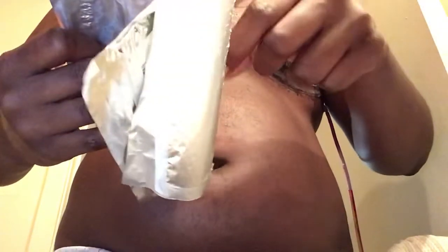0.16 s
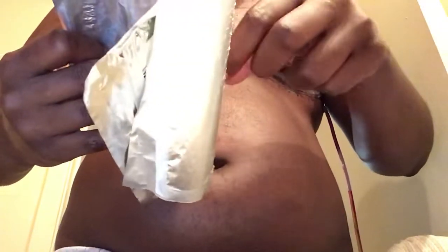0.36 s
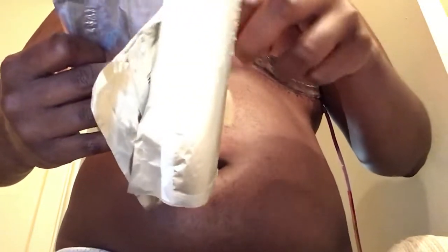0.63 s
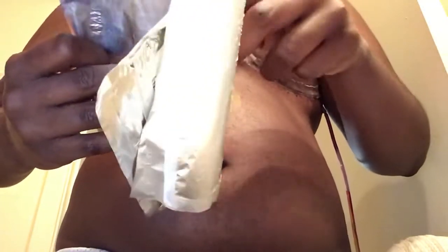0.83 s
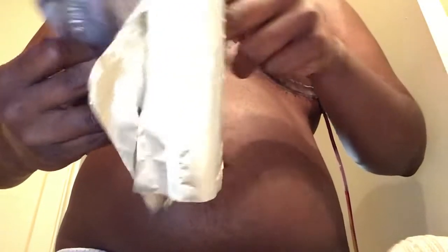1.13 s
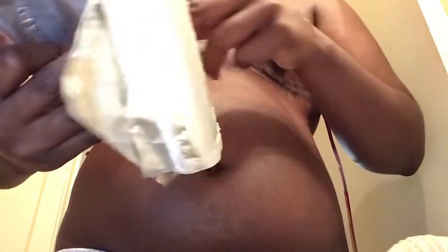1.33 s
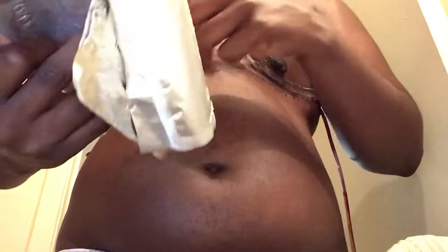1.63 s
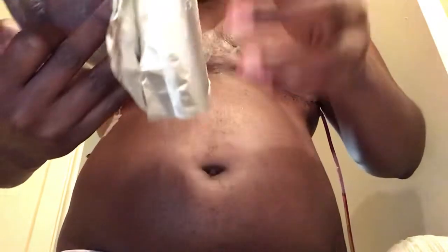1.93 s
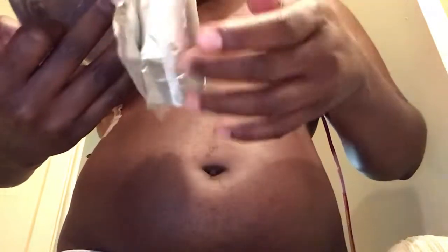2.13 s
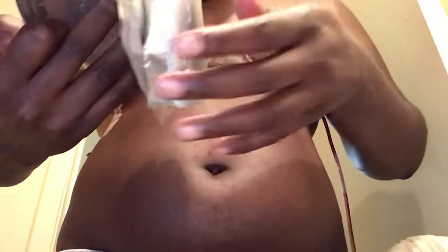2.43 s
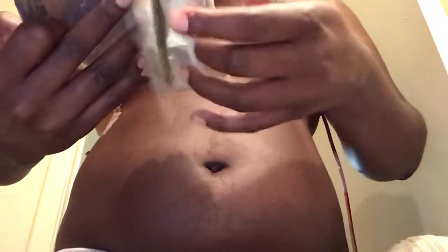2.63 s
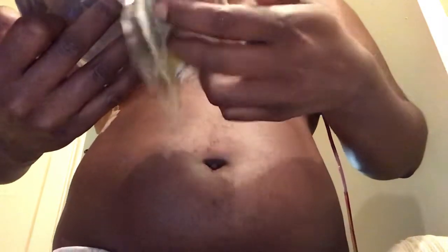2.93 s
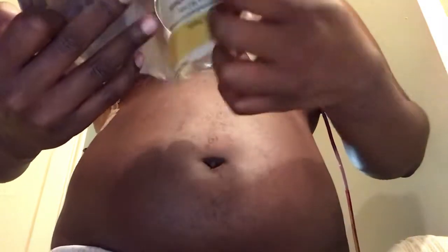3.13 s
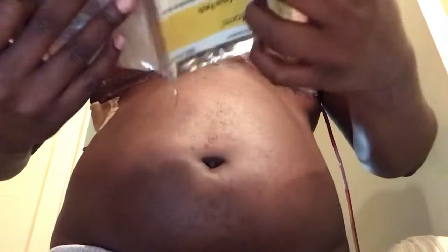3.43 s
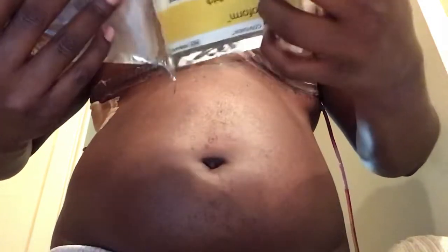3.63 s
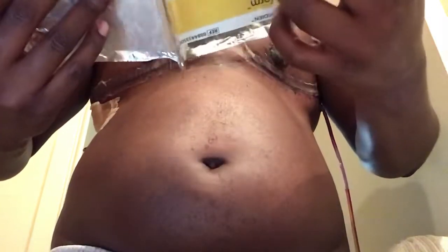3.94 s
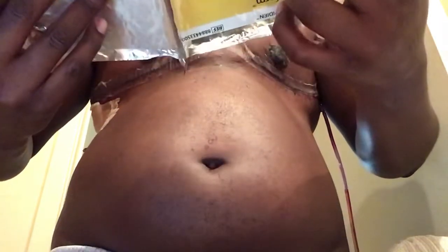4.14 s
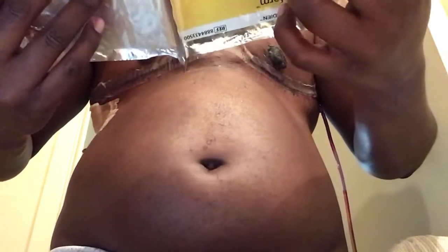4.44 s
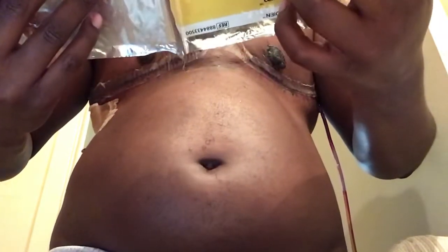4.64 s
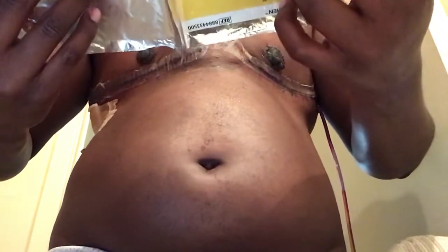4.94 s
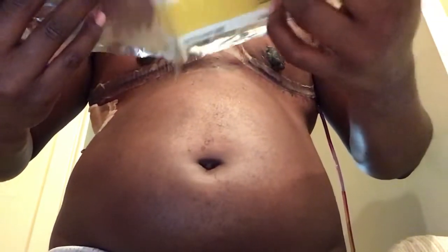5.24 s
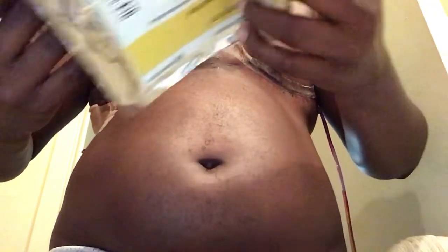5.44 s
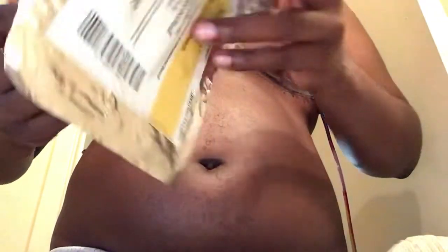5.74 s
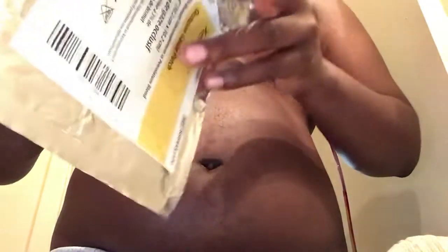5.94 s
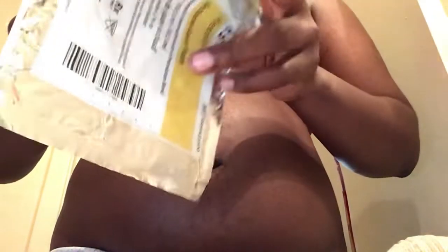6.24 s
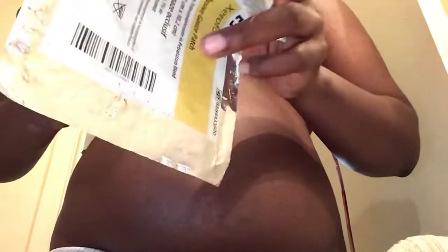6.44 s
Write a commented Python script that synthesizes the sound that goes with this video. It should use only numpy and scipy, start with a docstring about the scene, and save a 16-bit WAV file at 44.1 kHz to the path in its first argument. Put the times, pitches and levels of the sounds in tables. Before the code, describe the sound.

A steady low electric motor hum with a slow throb and a soft rush of air fills a small room throughout. For about two and a half seconds nothing else stands out. Then a stiff foil and paper pouch is turned in the hands: a tight cluster of bright snaps, sparser small clicks, a near pause, then another crisp flurry near the end. Close microphone, short room reflections.

```python
"""An electric motor hums and throbs behind a steady rush of air in a small room: sines over shaped noise.
In front of them a stiff pouch of foil and paper is turned over in two hands and pulled at.
Its facets buckle in sharp snaps: bursts of jolts and noise, shaped by rings and filters.
A faint crackle of random ticks runs between the snaps, and sliding foil fizzes briefly as grainy noise."""
import sys
import numpy as np
from scipy import signal
from scipy.fft import rfft, irfft
from scipy.io import wavfile

SR = 44100
rng = np.random.default_rng(int(sys.argv[2]) if len(sys.argv) > 2 else 0)


def dump(signal):
    """Clip the signal to [-1, 1] and save it as 16-bit WAV at the path in sys.argv[1]."""
    limited = np.clip(np.atleast_2d(signal).T, -1, 1)
    pcm = np.round(limited * 32767).astype(np.int16)
    wavfile.write(sys.argv[1], SR, pcm)


N = 290178

# Tone colour of cracking foil. Each row: frequency in Hz, relative level in dB.
CRACK_COLOUR = [(1800, -34), (3000, -0.5), (5000, 2), (8600, 1.5), (10000, -7), (12000, -7)]
# Tone colour of the foil's finest creases. Each row: frequency in Hz, relative level in dB.
SIZZLE_COLOUR = [(7000, -18), (10000, -4.5), (12000, -0.5), (14000, -7), (15800, -14)]
# The fingers tighten on the pouch, hold and let go.
# Each row: start of the hold in seconds, length of the hold in seconds, crackle level in dB.
FINGER_GRIPS = [(2.779, .24, -63.5), (3.111, 0.34, -57), (3.799, 0.31, -67), (5.417, 0.068, -63.5),
                (5.76, .22, -62.5), (6.162, 0.094, -63.5)]


def amp(db):
    """Turns decibels into a gain."""
    return 10 ** (np.asarray(db) / 20)


def evened(x):
    """Scales a sound to an rms (average strength) of one."""
    return x / np.sqrt(np.mean(x ** 2) + 1e-30)


def read(points, hz):
    """Reads a table between its rows, along a log-frequency axis."""
    f, value = np.transpose(points)
    return np.interp(np.log(hz + 1), np.log(f + 1), value)


def add(mix, s, sound):
    """Mixes a sound in at s seconds."""
    part = mix[round(s * SR):][:len(sound)]
    part += sound[:len(part)]


def drift(hz):
    """Makes a random wander of rms one, with little movement faster than hz."""
    f = np.fft.rfftfreq(N, 1 / SR)
    keep_slow = (f > 0) * np.exp(-(f / hz) ** 2)
    return evened(irfft(rfft(rng.standard_normal(N)) * keep_slow, N))


def colour(x, points, size=2048):
    """Filters to the given spectrum without sounding ahead, so that clicks keep their sharp front."""
    log_gain = np.log(amp(read(points, abs(np.fft.fftfreq(size, 1 / SR)))))
    # the Hilbert transform gives the phase that puts the energy as early as possible
    response = np.fft.ifft(np.exp(np.conj(signal.hilbert(log_gain)))).real
    return signal.fftconvolve(x, response[:size // 2])[:len(x)]


def air(level_db=-44.0, swell_db=0.48, ripple_db=2.5, ripple_hz=23.82):
    """Steady rush of moving air, lifted at its resonances and finely rippled by the room's standing waves."""
    # Colour of the air noise. Each row: frequency in Hz, relative level in dB per Hz.
    air_colour = [(28, -23), (55, -10), (85, -7), (125, -1.5), (175, -7), (225, -8.5), (420, -10.5),
                  (700, -13.5), (1400, -19), (2000, -23), (3500, -30), (5500, -36.5), (13600, -39),
                  (15800, -48)]
    # Resonances that the air stirs. Each row: frequency in Hz, width in Hz, lift in dB.
    resonances = [(171, 15, 10), (212.2, 10.3, 14), (249.5, 26.6, 10), (268.5, 16.7, 8.5), (311.6, 15, 5.5),
                  (349, 8, 8.5), (563, 19, 5.5), (587.5, 18, 13.5), (616.5, 6, 8.5), (644, 27, 4.5),
                  (695, 39, 6), (1020, 53, 3), (1054, 25, 8), (1295, 44, 6), (1490, 116, 3.5),
                  (3920, 230, 3), (5000, 460, 2)]
    hz = np.fft.rfftfreq(N, 1 / SR)
    lift_db = sum(db / (1 + (2 * (hz - f) / width) ** 2) for f, width, db in resonances)
    ripple = np.interp(hz / ripple_hz, np.arange(N), rng.standard_normal(N))
    shape_db = read(air_colour, hz) + lift_db + ripple_db * ripple * (hz > 700)
    level = amp(level_db + swell_db * drift(10.4))
    rush = irfft(rfft(rng.standard_normal(N)) * amp(shape_db), N)
    return level * evened(rush)


def motor(magnet_db=-42.0, sideband_db=-52.5, waver=0.00045, flutter_db=0.92,
          low_swell_s=0.34, magnet_swell_s=0.11):
    """Shaft tones and magnetic hum; the shaft is out of step with the mains, so neighbouring tones throb."""
    # Tones of the turning shaft. Each row: multiple of the shaft's speed, level in dB.
    shaft_tones = [(1, -69.5), (2, -48), (3, -49.5), (4, -33.5), (8, -65.5), (12, -57.5), (16, -57.5),
                   (20, -77), (23, -67.5), (24, -66), (25, -84), (28, -92)]
    shaft_hz, mains_hz = 40.47, 59.975
    t = np.arange(N) / SR
    turns = np.cumsum(shaft_hz * (1 + waver * drift(2.6))) / SR
    starts = rng.random(len(shaft_tones))
    cycles = {round(k): round(k) * turns + start for (k, db), start in zip(shaft_tones, starts)}
    hum = sum(amp(db) * np.sin(2 * np.pi * cycles[round(k)]) for k, db in shaft_tones)
    beat_hz = 3 * shaft_hz - 2 * mains_hz
    # the magnetic pull at twice the mains lies one beat under the third shaft tone
    magnet_cycles = cycles[3] - beat_hz * (t - magnet_swell_s)
    hum += amp(magnet_db) * np.sin(2 * np.pi * magnet_cycles)
    # the off-centre rotor adds a sideband to it, one beat under the second shaft tone
    sideband_cycles = cycles[2] - beat_hz * (t - low_swell_s)
    hum += amp(sideband_db) * np.sin(2 * np.pi * sideband_cycles)
    # the square root of two makes the tone levels rms levels
    return np.sqrt(2) * hum * amp(flutter_db * drift(6.8))


def room(x, early_db=-17.5, tail_db=-8.0, build_s=0.0045, count=16):
    """Near reflections from the body and walls, then a short tail that dies at its own pace in each band."""
    # How long the tail rings. Each row: frequency in Hz, time to fall by 60 dB in seconds.
    decay_times = [(300, 0.53), (1500, 0.12), (4000, 0.15), (10000, 0.27), (16000, 0.068)]
    t = np.arange(SR // 2) / SR
    early = np.zeros(len(t))
    delays = rng.uniform(0.0025, 0.019, count)  # seconds
    early[(delays * SR).astype(int)] = rng.choice([-1, 1], count) / np.sqrt(count)
    hz, at, z = signal.stft(rng.standard_normal(len(t)), SR, nperseg=256)
    decay = amp(-60 * at / read(decay_times, hz)[:, None])
    tail = signal.istft(z * decay, SR, nperseg=256)[1][:len(t)]
    tail = tail * (1 - np.exp(-(t / build_s) ** 2))
    echoes = amp(early_db) * early + amp(tail_db) * tail / np.linalg.norm(tail)
    return x + signal.fftconvolve(x, echoes)[:N]


def effort(squeeze_s=0.077, release_s=0.18, resting_db=-70):
    """How hard the fingers work the pouch, as a gain: each grip swells, holds and eases to a light hold."""
    t = np.arange(N) / SR
    grips = []
    for start, hold, db in FINGER_GRIPS:
        swell = np.minimum(t - start, 0) / squeeze_s
        ease = np.maximum(t - start - hold, 0) / release_s
        grips.append(amp(db) * np.exp(swell - ease))
    return np.maximum(np.max(grips, 0), amp(resting_db))


def crackle(ticks_per_s=1600, spread_db=1.0, clump_db=4.0, clump_hz=110):
    """Countless small wrinkles tick under the fingers, in little clumps."""
    # Tone colour of the small wrinkles. Each row: frequency in Hz, relative level in dB.
    wrinkle_colour = [(400, -14), (1000, 1.5), (1900, -2.5), (2700, 0), (3800, -2.5), (5500, -6),
                      (8500, -10), (13000, -17), (15800, -18)]
    sizes = amp(spread_db * np.minimum(rng.exponential(1, N), 4)) * rng.choice([-1, 1], N)
    ticks = sizes * (rng.random(N) < ticks_per_s / SR)
    ticks = ticks * amp(clump_db * drift(clump_hz))
    return evened(colour(ticks, wrinkle_colour)) * effort()


def rubs(crack_db=0.5, grain_db=3.0, grain_hz=400):
    """Sliding foil gives a brief, grainy fizz that swells and fades."""
    # Foil slides over foil. Each row: middle in seconds, half length in seconds, level in dB.
    slides = [(2.645, .035, -65), (2.995, 0.017, -60), (5.71, 0.013, -51.5)]
    t = np.arange(N) / SR
    press = sum(amp(db) * np.exp(-((t - s) / half) ** 2) for s, half, db in slides)
    press = press * evened(amp(grain_db * drift(grain_hz)))
    fine, coarse = rng.standard_normal((2, N))
    fizz = evened(colour(fine, SIZZLE_COLOUR))
    return press * (fizz + amp(crack_db) * evened(colour(coarse, CRACK_COLOUR)))


def buckle(t, length, slips_per_s=7000, fade=1.0, first=3.3):
    """A crease gives way: one jolt, then a dying run of tiny slips."""
    slips = rng.standard_normal(len(t)) * (rng.random(len(t)) < slips_per_s / SR)
    slips[0] = first
    return slips * np.exp(-fade * t / length)


def sheet(t, length, rise=0.19, fade=0.66, jolt=1.6):
    """Bending waves spread and bounce between the sheet's creases: a front, then a dense short ring."""
    swell = 1 - np.exp(-t / (rise * length))
    waves = rng.standard_normal(len(t)) * np.exp(-fade * t / length) * swell
    waves[0] = jolt
    return waves


def mode(t, hz, width):
    """A damped ring that swells over a cycle, so that it radiates little away from its pitch."""
    return t * np.exp(-1.5 * np.pi * width * hz * t) * np.sin(2 * np.pi * hz * t)


def snap(length, hz, ring, crack, sizzle, ring_db=-1.0, crack_db=0.9, sizzle_db=-0.3, flex_db=-28.5,
         flex_share=0.46, bass_edge=0.57, size=2048):
    """One buckle rings its facet, cracks the foil with its finest creases and flexes the paper behind it."""
    # Ways a facet rings. Each row: multiple of its pitch, width as a share of the mode's frequency,
    # relative level in dB.
    facet_modes = [(1.02, 0.21, 6), (1.45, 0.27, 2.5), (1.85, .25, -8.5)]
    # Tone colour of the flexing paper. Each row: frequency in Hz, relative level in dB.
    paper_colour = [(200, -28), (450, -1), (650, -2.5), (900, -3), (1600, 1), (2100, -13), (3500, -30)]
    t, length = np.arange(size) / SR, max(length, 1 / 2000)
    facet = np.zeros(size)
    for k, width, db in facet_modes:
        # every mode is shaken by its own part of the crease
        shaken = signal.fftconvolve(buckle(t, length), mode(t, k * hz, width))[:size]
        facet += amp(db) * evened(shaken)
    # a small facet radiates almost nothing below its lowest mode
    facet = signal.lfilter(*signal.butter(2, bass_edge * hz, "high", fs=SR), facet)
    sound = amp(ring + ring_db) * evened(facet)
    sound += amp(crack + crack_db) * evened(colour(sheet(t, length), CRACK_COLOUR))
    sound += amp(sizzle + sizzle_db) * evened(colour(sheet(t, length), SIZZLE_COLOUR))
    # the soft paper follows only a share of the facet's level
    sound += amp(flex_share * ring + flex_db) * evened(colour(sheet(t, length), paper_colour))
    return sound * np.sqrt(length / t[-1])  # levels hold over the length of the snap


def small_snaps(per_s=40, length_s=0.005, pitch_hz=2500, spread_octaves=0.21, over_db=5.5,
                spread_db=3.0, crack_db=-15.0, sizzle_db=-21.0, count=24):
    """While a grip lasts, small facets buckle by chance, louder under a firmer grip."""
    out = np.zeros(N)
    for start, hold, db in FINGER_GRIPS:
        draws = zip(rng.random((count, 2)), rng.standard_normal((count, 2)))
        for (place, chance), (pitch, strength) in draws:
            ring = db + over_db + spread_db * strength
            hz = pitch_hz * 2 ** (spread_octaves * pitch)
            sound = snap(length_s, hz, ring, ring + crack_db, ring + sizzle_db)
            happens = chance < per_s * hold / count
            add(out, start + place * hold, sound * happens)
    return out


def snaps():
    """The large facets give way one by one."""
    # The clear snaps, one buckling facet each. Each row: start in seconds, length in seconds,
    # facet pitch in Hz, then levels in dB before snap()'s trims: facet ring, foil crack, foil sizzle.
    clear_snaps = [(2.586, 0.0086, 2600, -50.5, -52, -53), (2.772, .003, 3360, -51, -56, -60),
                   (3, 0.0027, 2630, -46, -60, -60), (3.072, 0.0027, 4260, -37, -55, -46),
                   (3.1, 0.0033, 3010, -28.5, -38.5, -40), (3.135, 0.0037, 2560, -38, -43, -46),
                   (3.171, 0.0052, 2840, -50, -54, -65), (3.2623, .0019, 3980, -33, -38, -44),
                   (3.264, 0.0022, 3100, -29, -40, -39), (3.2697, 0.0092, 2580, -40.5, -49, -45),
                   (3.3505, 0.0033, 2540, -39.5, -48, -51), (3.354, 0.0018, 2300, -34.5, -36.5, -40.5),
                   (3.463, .0026, 2890, -45, -57, -61), (3.516, .0036, 2700, -43.5, -39, -52),
                   (3.785, .0031, 2540, -49.5, -72, -76), (3.9007, .003, 3120, -49, -52, -71),
                   (3.976, 0.0047, 1730, -41, -48, -57), (3.985, .0062, 2340, -43.5, -62, -70),
                   (4.196, .0027, 2800, -48, -48, -65), (4.554, 0.0041, 1770, -46.5, -63, -76),
                   (4.6, 0.0018, 1720, -65, -51, -46.5), (5.567, .0037, 2650, -41.5, -53, -54),
                   (5.715, 0.002, 2680, -33.5, -45, -49), (5.769, .0025, 2500, -35, -43, -58),
                   (5.781, .0032, 2540, -54, -57, -60), (6.0562, .0028, 2890, -49, -56, -57),
                   (6.13, 0.003, 2480, -38.5, -43.5, -47), (6.135, 0.0018, 2640, -38, -49, -58),
                   (6.163, .003, 2760, -47, -66, -66), (6.191, .0049, 2330, -47, -58, -61),
                   (6.224, 0.0028, 3360, -43.5, -50, -48)]
    out = np.zeros(N)
    for s, *facet in clear_snaps:
        add(out, s, snap(*facet))
    return out


def scene():
    """The pouch in its room, over the motor and the air."""
    pouch = snaps() + small_snaps() + crackle() + rubs()
    return (air() + motor() + room(pouch))[None]


def record(dry, echo_s=0.000337, echo_db=-22.5, edge_hz=15720):
    """A surface next to the microphone adds a faint echo that combs the sound; then the top treble is cut."""
    hz = np.fft.rfftfreq(N, 1 / SR)
    echo = amp(echo_db) * np.exp(-2j * np.pi * hz * echo_s)
    combed = irfft(rfft(dry) * (1 + echo), N)
    low_pass = signal.firwin(511, edge_hz, window=("kaiser", 9), fs=SR)
    return signal.oaconvolve(combed, low_pass[None], "same")


dry = scene()
out = record(dry)
dump(out)
```